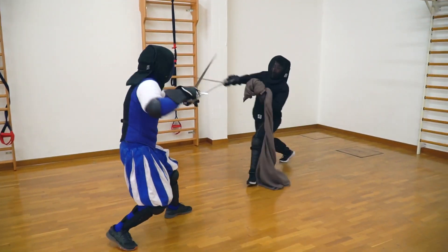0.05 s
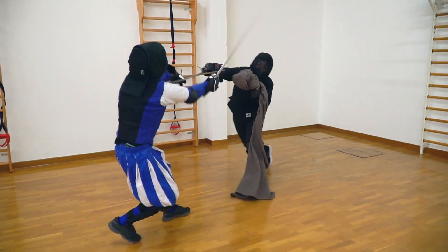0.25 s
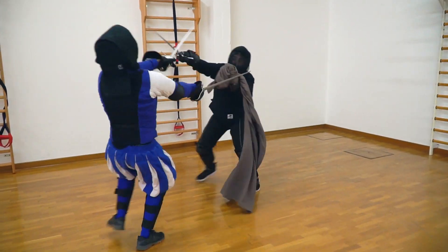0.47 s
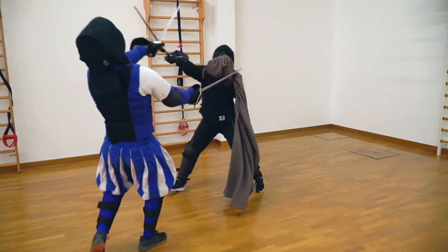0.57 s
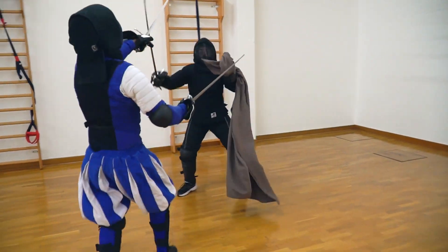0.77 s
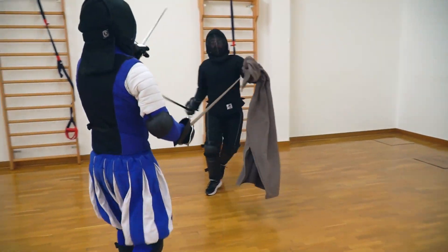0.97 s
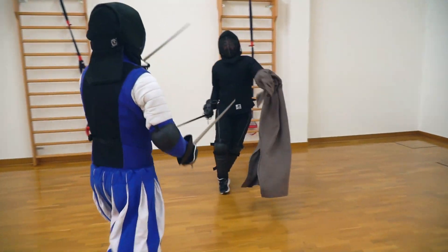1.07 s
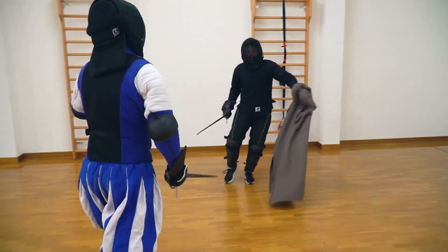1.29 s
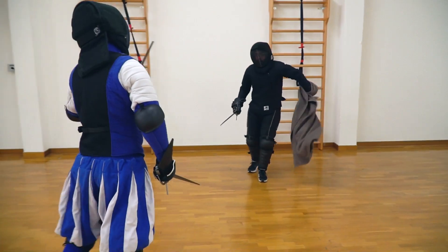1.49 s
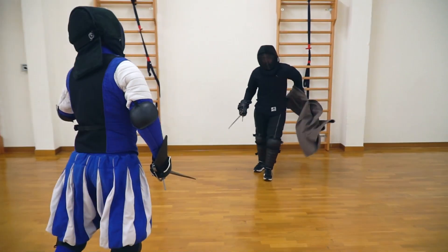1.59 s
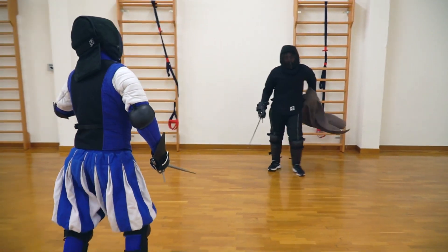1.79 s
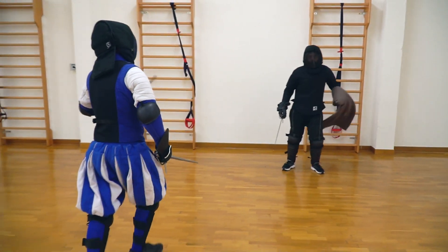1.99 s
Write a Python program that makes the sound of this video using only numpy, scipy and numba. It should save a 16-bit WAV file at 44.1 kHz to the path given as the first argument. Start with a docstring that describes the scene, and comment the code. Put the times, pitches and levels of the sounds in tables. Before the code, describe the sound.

Steel sword blades clash rapidly from 0.1 to 0.9 seconds, loudest at around 0.2, with a hollow rattle against a guard at 0.3. Short scrapes run between the lighter, ringing hits from 0.4, while feet thud faintly on a wooden floor. The gym's echo fades, leaving soft shoe taps near 1.2 and 1.7 seconds and a faint cloak swish from 1.8 over quiet room noise.

```python
"""Steel blades clash, knock on a guard and slide along each other as two fencers spar in a small gym.
Each impact excites the bending modes of the steel; sliding edges rasp by stick-slip friction.
Shoes tap and thud on the wooden floor and, at the end, a cloak swishes. The bare walls
reverberate over faint air noise and a low rumble."""
import sys
import numpy as np
from scipy import signal
from scipy.fft import rfft, irfft, next_fast_len
from scipy.io import wavfile
from scipy.ndimage import uniform_filter1d, minimum_filter1d
from numba import njit

SR = 44100
rng = np.random.default_rng(int(sys.argv[2]) if len(sys.argv) > 2 else 0)


def waveform_to_disk(signal):
    """Save audio, clipped to [-1, 1], as 16-bit WAV at the path in sys.argv[1]."""
    frames = np.transpose(np.atleast_2d(signal))
    scaled = np.clip(frames, -1, 1) * 32767
    samples = np.round(scaled).astype(np.int16)
    wavfile.write(sys.argv[1], SR, samples)


N = 90404
T = np.arange(N) / SR
IMPULSE = 1. * (T == 0)
TOP_HZ = 15750

# spectrum of the contact snap (frequency [Hz], relative level [dB])
SNAP_SPECTRUM = [(200, -27), (1300, -12), (4000, -13), (6500, -36.5), (8700, 2.5), (10500, -15),
                 (13200, 15.5), (16000, 6)]
# spectrum of the blades' many weak modes (frequency [Hz], relative level [dB])
DENSE_MODES = [(300, 11), (1200, -1), (3000, 2.5), (5500, 8.5), (6600, 1.5), (8500, 2.5), (9600, -14),
               (10400, 2.5), (13300, -10), (16000, -13.5)]
# blade impacts: three components, then the contact_tone gains applied to their sum
# (time [s], snap [dB], chatter [dB], ring [dB], middle [dB], upper [dB], top [dB])
CLASHES = [(0.102, -30, -32.5, -41, 15, 3.5, -11.5), (0.2113, 11.5, 9, 9.5, -3, -7, 4),
           (0.2274, -13, 6, 10.5, -7, -7, -21), (0.2662, 3, 3.5, 5.5, -7.5, -7, 1),
           (0.3776, -21, -7.5, -11, 5.5, 4, -3), (.396, -23, -8.5, -6.5, -10, -4.5, -1.5),
           (0.5089, -17.5, -17, -6.5, -1.5, -3, -5), (0.5959, -13, -7.5, -2, 1, 1, -4.5),
           (0.6881, -14, -1, -7, 1, 0.5, -12), (0.7037, -12, -8.5, -11, -11, -6, -5),
           (0.7204, -12, -8, -19, -1, -17, -4), (.788, -11, -19, 1, 0, -8, -12),
           (.8728, -25, -6, -5.5, -1.5, -3.5, -9)]
def clashes(chatter_s=.0055, chatter_lag_s=.0007, clink_t60_s=.016, wash_t60_s=.33):
    """Impact excitation: the blades snap, chatter for a few milliseconds, then vibrate freely."""
    out = np.zeros(N)
    snap = unit(colour(IMPULSE, SNAP_SPECTRUM))
    for start, snap_db, chatter_db, ring_db, *band_db in CLASHES:
        bounces = unit(noise(DENSE_MODES) * np.exp(-(T / chatter_s) ** 2))
        clink = steel(clink_t60_s, clink_t60_s)
        chatter = later(unit(undb(-2) * bounces + clink), chatter_lag_s)
        partials = steel(low_t60_s=.39, high_t60_s=.25)
        wash = unit(noise(DENSE_MODES) * fade(wash_t60_s))
        ringing = unit(undb(-3) * partials + wash)
        strike = undb(snap_db) * snap + undb(chatter_db) * chatter + undb(ring_db) * ringing
        out += later(contact_tone(strike, *band_db), start)
    return out


# strong resonances of the blades (cluster centre [Hz], relative level [dB])
BLADE_MODES = [(1345, -5.5), (1590, -6.5), (2200, -4.5), (3250, 0.5), (3920, 0.5), (4500, 1), (5300, -3),
               (6070, -3), (7060, 2), (7630, 0), (8060, 1.5), (8410, 0), (8830, 3), (9580, 4.5), (10500, 2),
               (11600, 1.5), (12660, -0.5), (13670, 2.5), (14750, -10), (15550, -4.5)]
def steel(low_t60_s, high_t60_s, modes_per_cluster=6):
    """Beating: each blade resonance is a cluster of close modes that interfere as they decay."""
    centres, db = np.repeat(np.array(BLADE_MODES, float), modes_per_cluster, axis=0).T
    spread_hz = 49 + .014 * centres
    hz = centres + spread_hz * rng.uniform(-1, 1, len(centres))
    return ring(hz, db, at_hz([(2000, low_t60_s), (13000, high_t60_s)], hz))


def contact_tone(x, middle_db, upper_db, top_db):
    """Modal weighting: the point of contact sets each band's gain; thin blades radiate little bass."""
    return colour(x, [(300, -19.5), (1300, middle_db), (2400, middle_db), (4200, upper_db),
                      (6000, upper_db), (7200, .011), (9000, .0059), (12000, top_db)])


# blade sliding on blade, with the contact_tone gains of its rasp (time [s], duration [s], rasp [dB],
# middle [dB], upper [dB], top [dB], zing start [Hz], zing end [Hz], zing [dB])
SCRAPES = [(0.388, .185, -43.5, 13, 9.5, -23, 2120, 2410, -51),
           (.6, 0.081, -40, 6.5, -1.5, -10, 3860, 5080, -46.5),
           (0.659, 0.082, -35, 1.5, 2, -3, 5800, 6230, -39.5),
           (0.783, 0.048, -50, 14.5, 2, -3, 6670, 8300, -41),
           (.874, 0.046, -41.5, 7.5, -3, -5, 7900, 9570, -44.5)]
def scrapes(slips_per_s=6000, t60_s=.007, zing_width_hz=730):
    """Stick-slip friction: edges catch and slip; a zing rises as the contact runs along the blade."""
    out = np.zeros(N)
    lowpass = signal.butter(2, zing_width_hz / 2, fs=SR, output="sos")
    for start, duration, rasp_db, *band_db, from_hz, to_hz, zing_db in SCRAPES:
        progress = np.minimum(T / duration, 1)
        pressure = np.sqrt(np.sin(np.pi * progress).clip(0))
        slips = (rng.random(N) < slips_per_s / SR) * rng.standard_normal(N) * pressure
        blade_response = unit(colour(IMPULSE, DENSE_MODES)) + undb(3.5) * steel(t60_s, t60_s)
        rasp = unit(contact_tone(through(slips, blade_response), *band_db))
        zing_hz = from_hz + (to_hz - from_hz) * progress
        carrier = np.exp(2j * np.pi * np.cumsum(zing_hz) / SR)
        # shift down, low-pass, shift back: a pass band that follows zing_hz
        zing = unit((signal.sosfilt(lowpass, slips / carrier + 1e-18) * carrier).real)
        slide = undb(rasp_db) * rasp + undb(zing_db) * zing
        out += later(slide, start) * np.sqrt(duration * SR)  # levels become rms over the slide
    return out


# resonances of the guard (frequency [Hz], relative level [dB], decay time T60 [s])
GUARD_MODES = [(480, -5, 0.039), (832, 7, .3), (1308, 13.5, 0.12), (1603, 7, 0.16), (2210, -20.5, 0.19)]
# spectrum of the hollow clack (frequency [Hz], relative level [dB])
CLACK_SPECTRUM = [(100, -33), (300, -20), (480, 3.5), (700, 1), (900, 2.5), (1100, -5), (1500, 4.5),
                  (2300, 0.5), (3600, -2.5), (6000, -10.5), (16000, -33)]
# knocks on the guard (time [s], level [dB])
KNOCKS = [(.3005, 4), (.3075, 1.5), (.321, -0.5), (.329, 1)]
def guard():
    """Shell resonance: a blade rattles against a guard, and each clack sets its modes ringing."""
    out = np.zeros(N)
    for start, db in KNOCKS:
        clack = impact(CLACK_SPECTRUM, click_db=-8.5, t60_s=.065)
        shell = ring(*np.array(GUARD_MODES).T)
        out += undb(db) * later(clack + undb(-9.5) * shell, start)
    return out


# spectrum of a sole on wood (frequency [Hz], relative level [dB])
TAP_SPECTRUM = [(60, -18), (170, 1.5), (550, 5.5), (850, -1.5), (1250, -2), (2400, -6), (4000, -15.5),
                (8000, -31), (16000, -40)]
# shoes tapping the boards, plus a light blade tick at 0.179 s voiced the same way (time [s], level [dB], decay
# time T60 [s])
TAPS = [(0.1172, -14, 0.049), (.1792, -23, 0.0096), (0.187, -37, 0.018), (1.2322, -15.5, 0.028),
        (1.255, -23.5, 0.067), (1.488, -34.5, .02), (1.657, -24.5, 0.04), (1.675, -24, 0.21),
        (1.71, -34.5, .04)]
# weight landing on the floor (time [s], level [dB], floor resonance [Hz])
THUDS = [(0.308, -18, 304), (0.413, -18.5, 135), (0.491, -25, 234), (.635, -21.5, 161), (.718, -12, 340),
         (0.812, -16, 200), (0.846, -15, 164), (.93, -21.5, 179)]
def feet(thud_t60_s=.14, band_edge_ratio=1.315):
    """Damped plate vibration: soles tap the boards and the floor booms under the fencers' weight."""
    out = np.zeros(N)
    for start, db, t60 in TAPS:
        out += undb(db) * later(impact(TAP_SPECTRUM, click_db=1, t60_s=t60), start)
    for start, db, hz in THUDS:
        band_hz = [hz / band_edge_ratio, hz * band_edge_ratio]
        boards = signal.butter(2, band_hz, "bandpass", fs=SR, output="sos")
        force = rng.standard_normal(N) * fade(thud_t60_s)
        out += undb(db) * later(unit(signal.sosfilt(boards, force)), start)
    return out


# spectra of the cloak's swish and the fencers' shuffling (frequency [Hz], relative level [dB])
CLOAK_SPECTRUM = [(300, -19), (2200, -9.5), (3800, 0.5), (7500, -0.5), (10000, -5), (14000, -13.5),
                  (16000, -20.5)]
SHUFFLE_SPECTRUM = [(70, -16), (180, -3.5), (400, -2.5), (1200, -11), (3000, -18.5), (9000, -34.5),
                    (16000, -40)]
# their envelopes, about which the level flutters (time [s], level [dB])
CLOAK_ENVELOPE = [(1.775, -80), (1.81, -62), (1.84, -58), (1.92, -54), (2.01, -53.5), (2.05, -59)]
SHUFFLE_ENVELOPE = [(0, -57.5), (.18, -49), (.7, -49.5), (1.15, -56), (1.401, -62), (1.559, -57.5),
                    (1.78, -67), (2.05, -59)]
def cloth(flutter_db=2.5, folds_per_s=60):
    """Friction noise: rubbing cloth hisses, modulated in amplitude as its folds shift."""
    out = np.zeros(N)
    fold_times = np.arange(0, T[-1] + 1, 1 / folds_per_s)
    for spectrum, envelope in (CLOAK_SPECTRUM, CLOAK_ENVELOPE), (SHUFFLE_SPECTRUM, SHUFFLE_ENVELOPE):
        hiss = noise(spectrum)
        flutter = np.interp(T, fold_times, rng.standard_normal(N)[:len(fold_times)])
        out += hiss * undb(over_time(envelope) + flutter_db * flutter)
    return out


# reverberation of the gym (frequency [Hz], decay time T60 [s])
GYM_T60 = [(125, 1.4), (600, 1.2), (2000, 1.06), (5000, 1.), (9000, 0.79), (15000, 0.23)]
def gym(bands=12, wall_delay_s=.015):
    """Diffuse reverberation: the impulse response of the bare room, whose treble is absorbed first."""
    spectrum = rfft(rng.standard_normal(N))
    freqs = np.arange(len(spectrum)) * SR / N
    centres = np.geomspace(100, TOP_HZ, bands)
    tail = np.zeros(N)
    for hz, weights in zip(centres, np.eye(bands)):
        band = irfft(spectrum * at_hz(list(zip(centres, weights)), freqs), N)
        tail += band * fade(at_hz(GYM_T60, hz))
    return later(unit(tail), wall_delay_s)


# spectra of the still air and the rumble (frequency [Hz], relative level [dB])
AIR_SPECTRUM = [(35, -31), (60, -10), (81, -4.5), (330, -11.5), (862, -17.5), (1220, -13.5), (5330, -26),
                (8320, -24), (10000, -33.5), (14900, -33.5), (16000, -53)]
RUMBLE_SPECTRUM = [(8, -15.5), (17, -5), (25, 1.5), (31, -12), (45, -27), (80, -48), (200, -83.5)]
# envelope of the rumble (time [s], level [dB])
RUMBLE_ENVELOPE = [(0, -46.5), (.55, -38.5), (1., -44.5), (1.5, -45.5), (2.05, -44.5)]
def background(air_db=-60):
    """Ambient noise: a steady broadband floor and a deep rumble that swells and recedes."""
    air = undb(air_db) * noise(AIR_SPECTRUM)
    rumble = noise(RUMBLE_SPECTRUM) * undb(over_time(RUMBLE_ENVELOPE))
    return air + rumble


def impact(spectrum, click_db, t60_s):
    """Source and filter: a click and a decaying noise burst, shaped by a spectrum to unit energy."""
    burst = unit(rng.standard_normal(N) * fade(t60_s))
    return unit(colour(undb(click_db) * IMPULSE + burst, spectrum))


def ring(hz, db, t60):
    """Free vibration: modes start at random phases, with unit total energy."""
    return unit(modes(hz * 1., undb(db), t60 * 1., rng.uniform(0, 2 * np.pi, len(hz))))


@njit
def modes(hz, gain, t60, phase):
    """Modal superposition: a sum of damped sinusoids."""
    out = np.zeros(N)
    for k in range(len(hz)):
        phasor = gain[k] * np.exp(1j * phase[k])
        step = np.exp((2j * np.pi * hz[k] - np.log(1000) / t60[k]) / SR)
        for i in range(min(N, int(t60[k] * SR))):
            phasor *= step
            out[i] += phasor.imag
    return out


def noise(points):
    """Spectral shaping: Gaussian noise of rms 1 with the given spectrum."""
    size = next_fast_len(N, real=True)
    white = rfft(rng.standard_normal(size))
    gain = undb(at_hz(points, np.arange(len(white)) * SR / size))
    return unit(irfft(white * gain, size)[:N]) * np.sqrt(N)


def colour(x, points, size=2048):
    """Minimum-phase filtering: folding the cepstrum gives a causal filter with the given spectrum."""
    db = at_hz(points, np.arange(size // 2 + 1) * SR / size)
    cepstrum = irfft(db * np.log(10) / 20)
    cepstrum[1:size // 2] *= 2
    cepstrum[size // 2 + 1:] = 0
    return through(x, irfft(np.exp(rfft(cepstrum))))


def through(x, response):
    """Convolution with an impulse response."""
    return signal.fftconvolve(x, response)[:N]


def later(x, s):
    """Delay by s seconds."""
    return np.concatenate([np.zeros(int(max(s, 0) * SR)), x])[:N]


def fade(t60):
    """Exponential decay, 60 dB in t60 seconds."""
    return np.exp(-np.log(1000) * T / max(t60, 1e-3))


def at_hz(points, hz):
    """Interpolation on a log-frequency axis."""
    freqs, values = np.array(points, float).T
    return np.interp(np.log(np.maximum(hz, 1)), np.log(freqs), values)


def over_time(points):
    """Linear interpolation in time."""
    return np.interp(T, *np.array(points).T)


def unit(x):
    """Normalisation to unit energy."""
    return x / np.sqrt(np.sum(x ** 2) + 1e-18)


def undb(db):
    """Decibels to amplitude ratio."""
    return 10 ** (np.asarray(db) / 20)


def scene():
    """Superposition: the direct sound of the bout, its reverberation and the background."""
    blades, knocks, steps = clashes() + scrapes(), guard(), feet()
    into_room = undb(-12.5) * blades + undb(-11) * knocks + undb(-16) * steps
    reverberation = through(into_room, gym())
    return (blades + knocks + steps + reverberation + cloth() + background())[None]


def record(dry, ceiling=1., window_s=.001):
    """Peak limiting: the gain dips at the hardest strikes; a low-pass then cuts the highest treble."""
    size = int(window_s * SR)
    needed_gain = ceiling / np.maximum(np.abs(dry), ceiling)
    gain = uniform_filter1d(minimum_filter1d(needed_gain, size), size)
    lowpass = signal.ellip(10, .2, 80, TOP_HZ, fs=SR, output="sos")
    return signal.sosfilt(lowpass, dry * gain)


dry = scene()
out = record(dry)
waveform_to_disk(out)
```